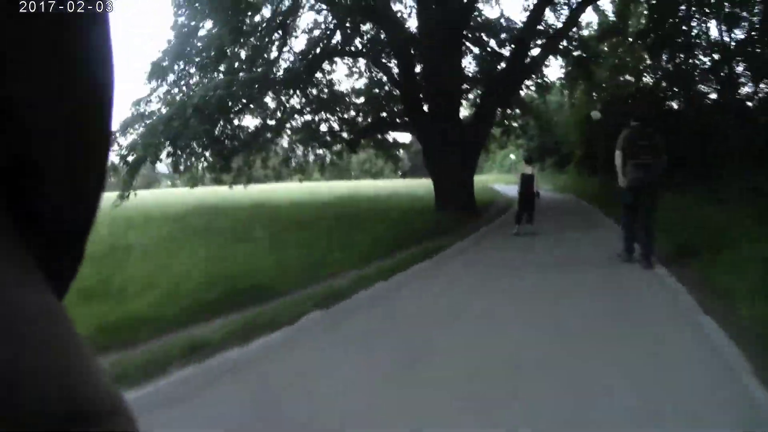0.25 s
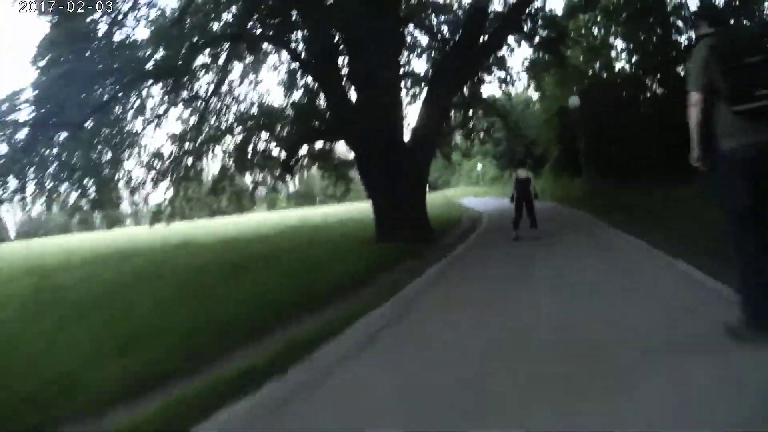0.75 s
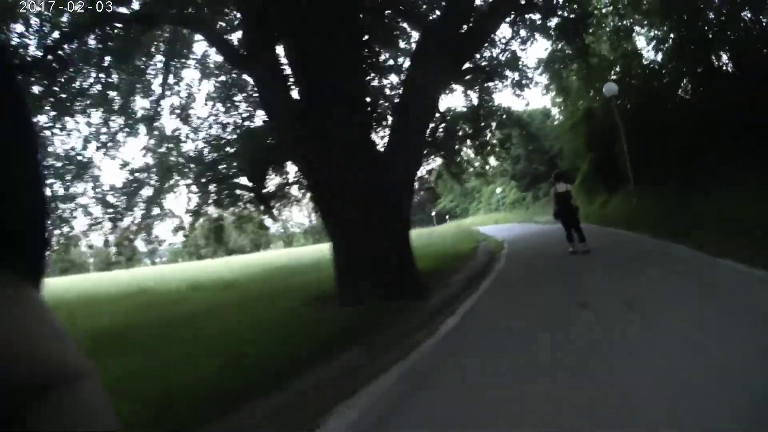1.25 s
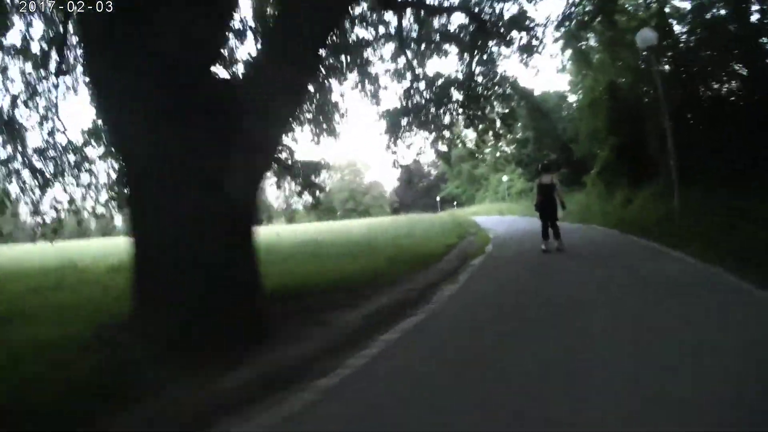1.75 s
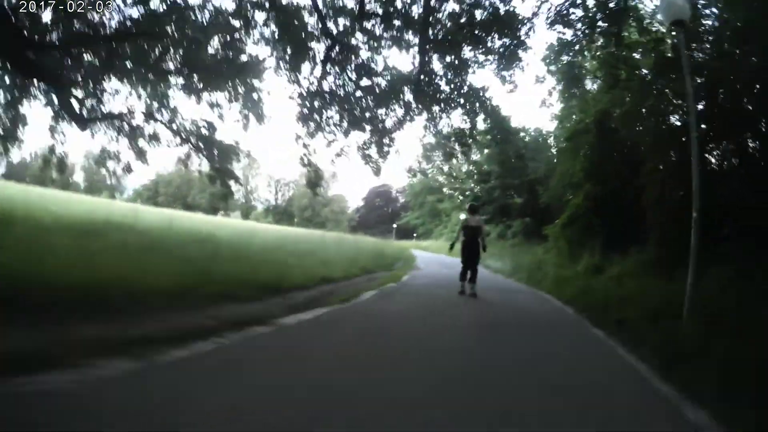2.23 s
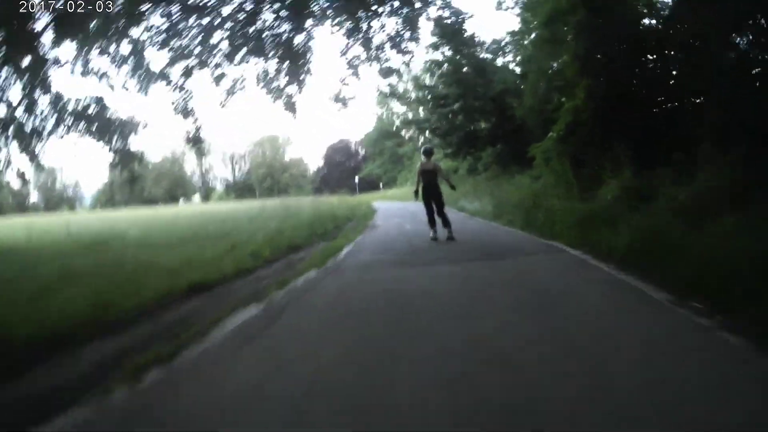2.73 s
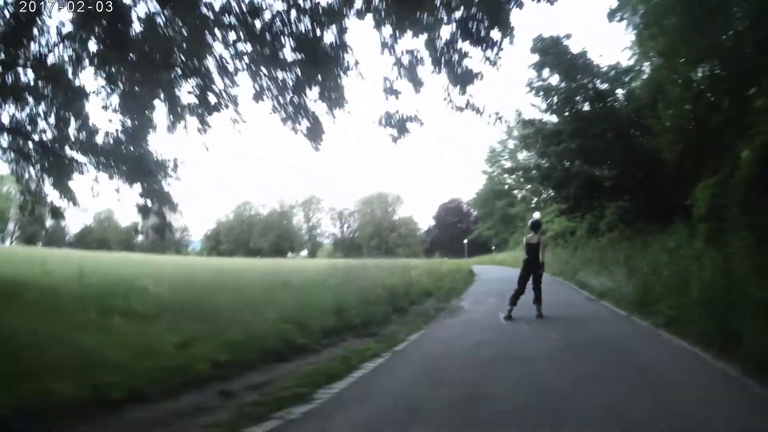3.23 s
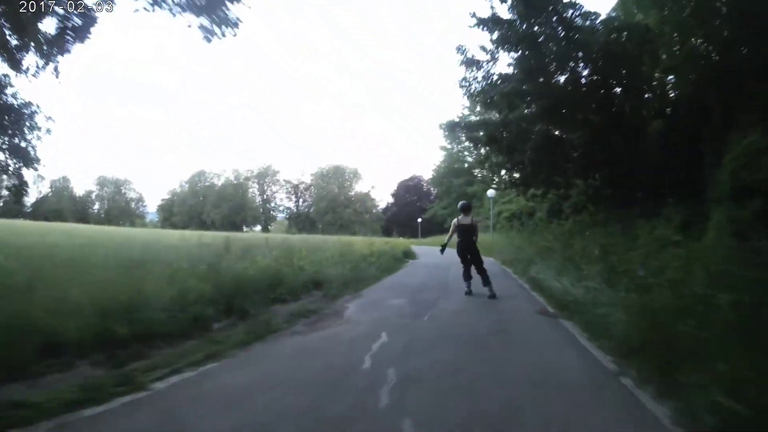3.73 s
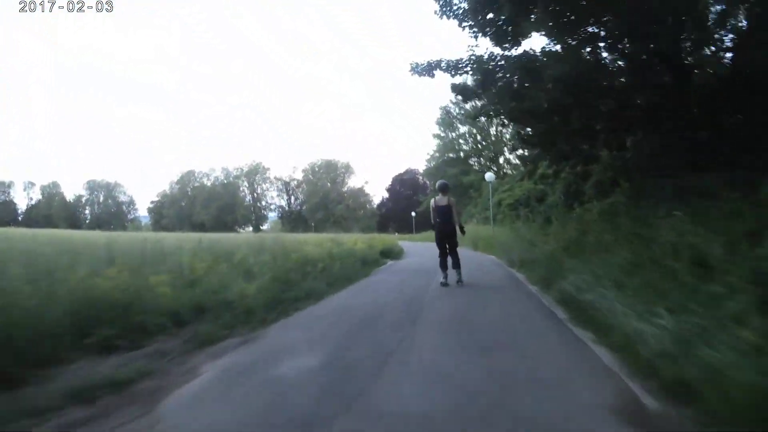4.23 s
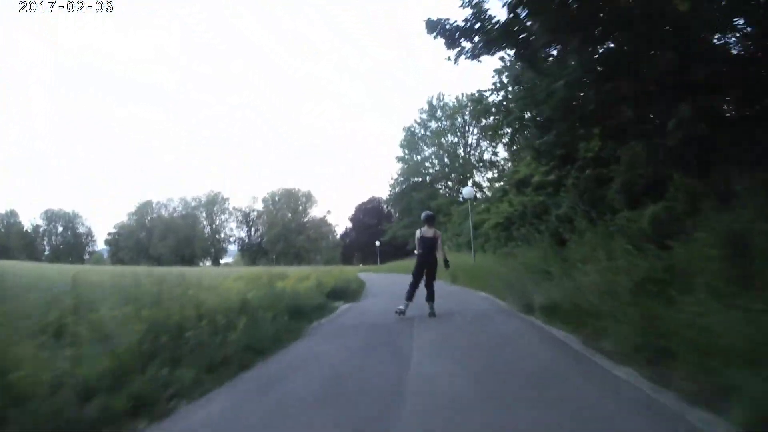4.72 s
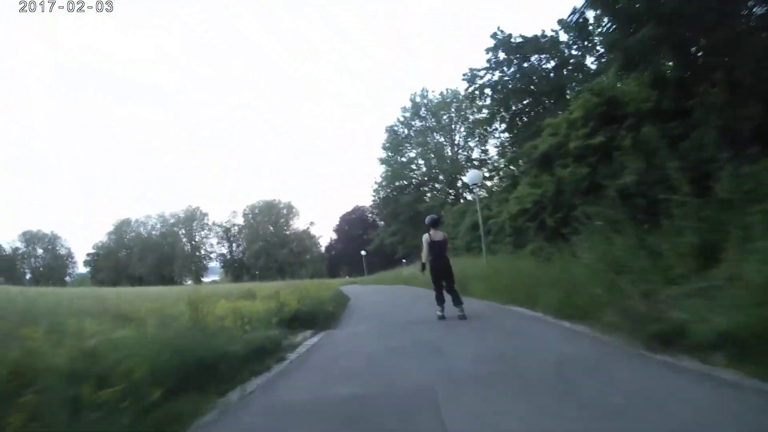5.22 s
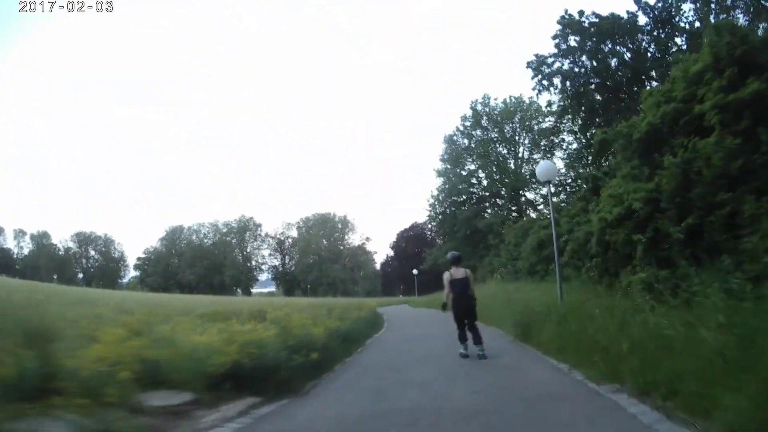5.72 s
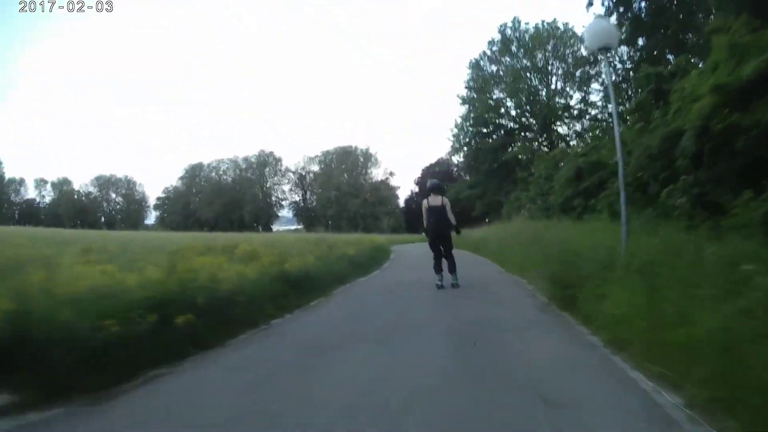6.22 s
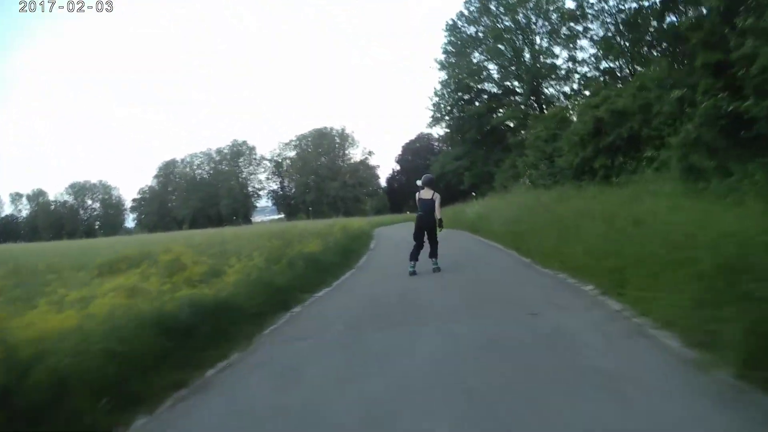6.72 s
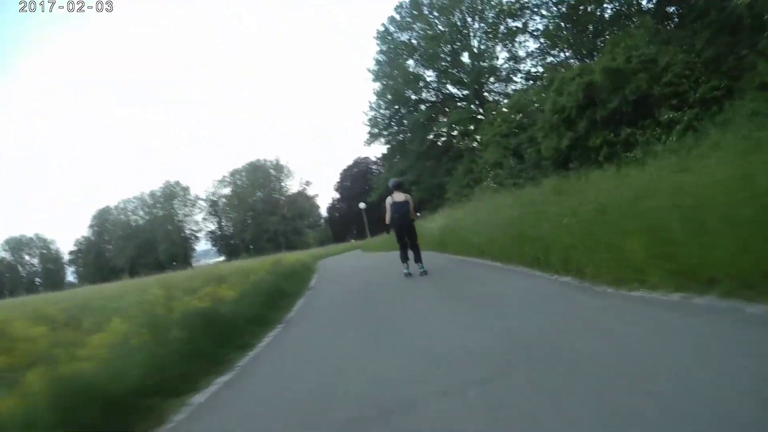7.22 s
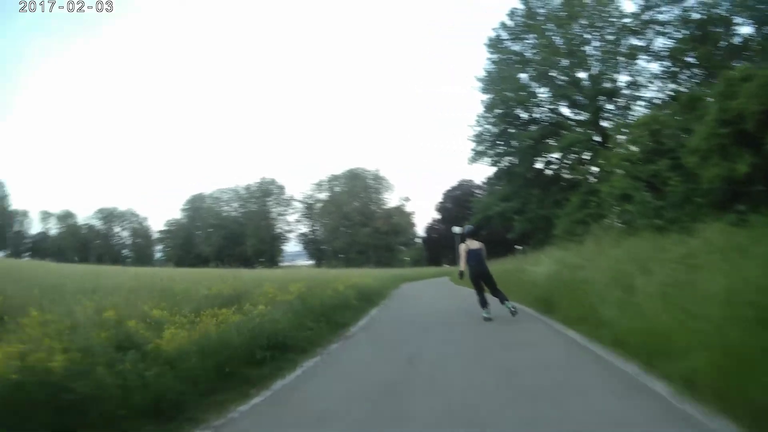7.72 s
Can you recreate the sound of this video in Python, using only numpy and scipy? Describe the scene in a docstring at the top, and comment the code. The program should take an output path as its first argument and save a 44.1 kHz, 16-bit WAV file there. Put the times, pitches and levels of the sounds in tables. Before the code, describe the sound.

Close, mono, outdoor sound from a body-worn camera: inline skate wheels roll on asphalt with a grainy rattling roar, rising with each push. Scratches and hard hollow knocks hit the plastic case in the first 1.3 seconds, the last the loudest. Afterwards low wind buffeting, pressure pops, soft whooshes and sparse ticks continue over the quieter rolling, with faint steady hiss.

```python
"""Inline skates coast down an asphalt park path: a gritty rolling roar that swells with every stroke.
Grain noise rattles frame and hub resonances; now and then a wheel scrubs or a part clicks.
Head wind buffets the skater's camera as low limited noise, with rush, whooshes and pressure pops.
Early on, scratches and ringing knocks sound on the camera case.
The electronics add a faint cluster of high sines and steady hiss."""
import sys
import numpy as np
from scipy import signal
from scipy.fft import rfft, irfft, next_fast_len
from scipy.io import wavfile
from scipy.ndimage import uniform_filter1d

SR = 44100
rng = np.random.default_rng(int(sys.argv[2]) if len(sys.argv) > 2 else 0)


def store_wav(level_fs):
    """Save 16-bit WAV to argv[1]."""
    pcm = np.round(np.clip(np.atleast_2d(level_fs), -1, 1) * 32767)
    wavfile.write(sys.argv[1], SR, pcm.T.astype(np.int16))


N = 351036
T = np.arange(N) / SR  # time in seconds

# Rolling on the slope. Each row: time in seconds, base wheel roar in dB, base bright grit in dB.
COAST = [(0, -49.5, -57.5), (0.6, -55, -65.5), (0.95, -58.5, -70), (1.4, -52, -61.5), (1.8, -56, -65.5),
         (2.4, -55.5, -65), (2.9, -60.5, -69.5), (3.2, -60.5, -67), (4.15, -55, -63.5),
         (4.45, -60.5, -69.5), (5.4, -61.5, -72), (6.3, -59.5, -67), (6.8, -60.5, -71),
         (7.96, -58.5, -69.5)]
# Strokes on one skate. Each row: hardest push in seconds, gain in dB.
STROKES = [(0.2, -1.5), (0.45, -4), (1.2, 4), (2.08, 4), (2.77, 6.5), (3.2, 4), (3.6, 4), (4.25, 2),
           (4.9, 4), (5.4, 1), (6.03, 6), (6.98, 4), (7.92, 1)]
# A skate is unweighted between strokes. Each row: start and end in seconds, level change in dB.
LIFTS = [(0.5, 0.584, -7), (0.821, 0.883, -4), (1.74, 1.85, -2.5), (3.01, 3.074, -6.5), (5.58, 5.783, -2),
         (7.333, 7.376, -5.5)]
# Skate frames and boots. Each row: resonance in Hz, nominal width in Hz, relative level in dB.
FRAME = [(1022, 265, 1.5), (1880, 370, -7), (2510, 590, -14.5)]
# Wheel hubs and bearings. Each row: resonance in Hz, nominal width in Hz, relative level in dB.
HUBS = [(3527, 510, 6), (4525, 680, -0.5), (5345, 420, 0), (6000, 550, -2), (7400, 700, -8)]
# Broad colours of wheel roar and bright grit. Each row: frequency in Hz, relative level in dB.
ROAD_COLOUR = [(150, -16), (300, 3.5), (520, -2.5), (800, 3), (1250, 1), (1550, -5), (2300, -16.5),
               (3100, -22.5), (5000, -51), (9000, -41.5)]
GRIT_COLOUR = [(1200, 1.5), (2400, -1), (3000, 3), (4800, -8.5), (7000, -5.5), (8500, -12.5),
               (12000, -18.5), (16000, -24)]

# Head wind. Each row: time in seconds, base rush level in dB.
WIND = [(0, -46), (0.55, -55), (0.85, -55), (1.2, -42), (1.85, -55.5), (2.1, -52), (2.25, -51),
        (2.58, -49.5), (2.95, -53.5), (3.3, -54.5), (4.0, -52.5), (4.3, -50.5), (5.05, -52), (5.3, -55.5),
        (5.7, -60), (6.1, -52), (7.05, -53.5), (7.33, -57), (7.96, -53)]
# Gusts, one swell each. Each row: peak time in seconds, buffeting gain in dB.
GUSTS = [(0.09, 11.5), (0.25, 14.5), (0.68, 6.5), (1.05, 7.5), (1.3, 7), (1.52, 13), (2.0, 10), (2.68, 6),
         (3.14, 5), (3.5, 5), (4.62, -1.5), (4.94, 9.5), (5.2, 9), (5.45, 9), (5.92, 11.5), (6.38, 7),
         (6.73, 10), (7.02, 9.5), (7.48, 3.5)]
# Air grazing the microphone port. Each row: start and end in seconds, hollow whoosh and thin hiss in dB.
GRAZES = [(2.365, 2.877, -60.5, -86), (2.566, 2.82, -70, -73), (4.566, 5.22, -62.5, -84),
          (4.888, 5.086, -67, -70.5), (5.3, 5.55, -71, -98), (6.67, 7.2, -63, -84)]
# Colours of low buffeting and airy rush. Each row: frequency in Hz, relative level in dB.
BUFFET_COLOUR = [(3, -5.5), (10, 3.5), (20, -0.5), (35, -13), (60, -21.5), (100, -30), (200, -58.5),
                 (500, -81.5)]
RUSH_COLOUR = [(30, -2.5), (75, 1), (120, -3.5), (200, -2.5), (350, -12.5), (600, -14), (1500, -38.5),
               (4000, -65.5)]

# Whine of the electronics. Each row: frequency in Hz, rms level in dB.
WHINE = [(11072, -103), (11122, -92), (11172, -95), (11222, -92.5), (11272, -100)]
# Colour of the electronic hiss. Each row: frequency in Hz, relative level in dB.
HISS_COLOUR = [(100, -6), (2000, 4.5), (8000, -2), (15000, -2)]

# Rubs on the case. Each row: start and end in seconds, level at the crest in dB.
RUBS = [(0.086, 0.102, -45.5), (0.153, 0.36, -53.5), (0.326, 0.546, -51), (1.023, 1.114, -54),
        (1.091, 1.156, -34.5), (1.11, 1.233, -47), (1.21, 1.317, -43)]
# Knocks on the case. Each row: start in seconds, ring peak in dB, contact time in ms,
# gain of the upper modes in dB, crack peak in dB, crack decay constant in ms.
KNOCKS = [(.116, -19.5, 1.24, 17, -44, 1.5), (0.1788, -27, 0.2, 6, -37, 3),
          (0.226, -24, 0.97, 18, -50, 1.8), (.586, -45, 0.17, 9, -59, 1.2),
          (0.8944, -23.5, 0.84, 13.5, -30, 1.4), (.931, -35.5, 0.69, 12, -62, 1.5),
          (.969, -32.5, 0.7, -1, -39.5, 2.9), (1.009, -38, 0.53, 11, -43, 1),
          (1.1213, -22, 0.25, 32, -16.5, 2.8), (1.129, -35, 0.15, -3, -25, 2.6),
          (1.1323, -21.5, 0.22, -7, -16.5, 2.3), (1.2745, -24, 1.27, 0, -57, 2),
          (1.2845, -10.5, 0.89, -2, -29, 10)]
# Camera case modes. Each row: frequency in Hz, relative level in dB, time to fall 60 dB in seconds.
CASE_MODES = [(420, -5.5, 0.028), (473, -2, 0.063), (520, -19, 0.017), (750, -21, 0.012), (920, -5, 0.023),
              (1030, 1.5, 0.0092), (1900, -17, 0.028), (2284, -8.5, 0.034), (3400, -24, 0.018),
              (5270, -24, .02)]
# A loose part buzzing with the hardest knock: start and end in seconds.
BUZZ_SPAN = (1.281, 1.307)
# Colours of a rub and of a sharp crack. Each row: frequency in Hz, relative level in dB.
RUB_COLOUR = [(100, 13.5), (300, -3.5), (490, 6.5), (700, -14), (1000, -1), (1500, -2), (2200, 1.5),
              (3600, -10), (4600, -13), (6500, -22), (9000, -28), (15000, -46)]
CRACK_COLOUR = [(300, 0), (1000, 7), (2300, -3), (3400, 4.5), (4500, -11.5), (6000, -7.5), (8500, -25),
                (12000, -31.5), (15000, -31)]

# Air pops at the port, plus two skates landing back after a lift (0.587 and 3.061 s), made the same way. Each
# row: start in seconds, pulse peak in dB, rise time in ms, crackle peak in dB.
POPS = [(0.0901, -20, 7.2, -39), (0.222, -19, 5.2, -40), (0.587, -39, 1.5, -42), (0.8933, -22.5, 2.1, -65),
        (1.095, -33, 2.4, -55), (1.224, -24, 3.2, -51), (1.526, -45, 5.7, -47), (1.994, -32, 3.3, -43),
        (2.407, -22.5, 1.86, -32), (3.061, -30, 2.4, -49), (3.419, -35, 0.57, -42), (3.559, -26, 5.2, -48),
        (3.66, -31.5, 3.6, -47), (3.845, -31.5, 6.2, -52), (4.246, -23, 2.2, -31.5), (4.54, -31, 4, -56),
        (4.647, -29, 1.8, -48), (4.918, -30, 5.1, -60), (5.2042, -18.5, 1.1, -27), (6.381, -17, 1.83, -41),
        (6.718, -20, 4.2, -45), (7.035, -32, 2.1, -41)]
# Colour of the crackle in a pop. Each row: frequency in Hz, relative level in dB.
CRACKLE_COLOUR = [(100, -8), (400, -6.5), (1050, 8), (1450, -5), (2200, -3), (3200, -26), (6000, -39),
                  (15000, -52)]

# Wheels scrub sideways on a stroke. Each row: start and end in seconds, centre in Hz, nominal level in dB.
SCRUBS = [(0.38, 0.535, 3400, -65.5), (1.15, 1.24, 5800, -65), (2.545, 3.02, 5600, -72.5),
          (3.047, 3.447, 7200, -80), (3.397, 4.148, 7400, -82), (4.85, 5.15, 5560, -74),
          (6.846, 7.338, 5600, -75)]
# Stones and skate parts clicking, and wheels landing back on the asphalt after a lift (0.969, 3.908, 5.784 and
# 7.379 s). Each row: start in seconds, peak in dB, ring in Hz.
CLICKS = [(0.969, -44, 5230), (1.447, -45, 5630), (2.246, -44.5, 3440), (2.388, -55, 8800),
          (2.562, -48, 5470), (3.184, -43.5, 5400), (3.42, -45.5, 3600), (3.908, -45.5, 1100),
          (4.06, -41.5, 6000), (4.245, -38.5, 5670), (4.278, -41, 5500), (5.784, -49.5, 6800),
          (5.971, -48, 3380), (6.381, -53, 3600), (7.004, -44, 3400), (7.037, -46, 5600),
          (7.046, -44.5, 5540), (7.133, -53.5, 5600), (7.379, -54, 1900)]

PUSH_S, RELEASE_S = 0.45, 0.17  # a stroke builds, then lets go
GRIT_STROKE_SHARE = 0.6  # share of a stroke's dB gain that the grit takes
GUST_S, GUST_RUSH_SHARE = 0.19, 0.25  # length of a gust; share of its dB gain that the rush takes
BUFFET_OVER_RUSH_DB = 13.5
BUFFET_LIMIT = 0.11  # amplitude ceiling
BUZZ_HZ, BUZZ_WIDTH_HZ, BUZZ_DB = 6400, 4300, -52
TOP_HZ = 15750


def undb(db):
    """Decibels to an amplitude factor."""
    return 10 ** (np.asarray(db) / 20)


def unit(x):
    """Scale to an rms of 1."""
    return x / np.sqrt(np.mean(x ** 2))


def peak(x, db):
    """Scale to a peak level."""
    return x * undb(db) / np.abs(x).max()


def curve(table, column):
    """One column of a table, joined by straight lines in time."""
    rows = np.array(table)
    return np.interp(T, rows[:, 0], rows[:, column])


def walk(rate):
    """Smooth random wandering with unit rms, taking a number of new steps per second."""
    hold = max(int(SR / rate), 2)
    steps = np.repeat(rng.standard_normal(N // hold + 1), hold)
    return unit(uniform_filter1d(steps, hold)[:N])


def swell(start, end):
    """A rounded rise and fall between two times."""
    return np.sin(np.pi * np.clip((T - start) / (end - start), 0, 1))


def colour(x, points):
    """Minimum-phase filter with the given outline, so no sound precedes its cause."""
    size = 2 * next_fast_len(len(x) // 2 + 4096)
    hz, db = np.transpose(points)
    bins = np.maximum(np.arange(size // 2 + 1) * SR / size, 1)
    outline_db = np.interp(np.log(bins), np.log(hz), db)
    # folding the cepstrum forward in time makes the filter causal
    cepstrum = irfft(np.log(undb(outline_db)))
    cepstrum[1:size // 2] *= 2
    cepstrum[size // 2 + 1:] = 0
    response = np.exp(rfft(cepstrum))
    return irfft(rfft(x, size) * response)[:len(x)]


def band(x, hz, width):
    """One resonance, gain 1 at its centre."""
    return signal.lfilter(*signal.iirpeak(hz, hz / width, fs=SR), x)


def double_band(x, hz, width):
    """The same resonance twice over, for steeper skirts."""
    return band(band(x, hz, width), hz, width)


def swish(hz, width):
    """A soft-edged band of hiss."""
    return unit(double_band(rng.standard_normal(N), hz, width))


def grains(rate, spread_db):
    """Tiny impacts of uneven size at random moments; the soft wheels cap the largest."""
    hit = rng.random(N) < rate / SR
    sizes = rng.standard_normal(N) * undb(spread_db * rng.standard_normal(N))
    return unit(hit * np.clip(sizes, -6, 6))


def burst(decay, tail_db=-60, tail=0.01):
    """A tenth of a second of noise that dies fast, then lingers."""
    t = T[:SR // 10]
    envelope = np.exp(-t / decay) + undb(tail_db) * np.exp(-t / tail)
    return rng.standard_normal(len(t)) * envelope


def add(out, start, sound):
    """Mix a sound in at a time in seconds."""
    i = max(int(start * SR), 0)
    out[i:i + len(sound)] += sound[:N - i]


def stroke_db():
    """Each push builds steadily and eases off after its peak."""
    return sum(db * np.interp(T - s, [-PUSH_S, 0, RELEASE_S], [0, 1, 0]) for s, db in STROKES)


def wheel_load(turn_hz=26, lumpy_db=0.83, flutter_db=1.5):
    """Worn wheels press harder once a turn, the pressure flutters, and lifted skates press less."""
    turns = np.cumsum(turn_hz * (1 + 0.079 * walk(2.2))) / SR
    lift_db = sum(db * ((T > start) & (T < end)) * 1. for start, end, db in LIFTS)
    lift_db = uniform_filter1d(lift_db, size=500)  # soften the edges
    return undb(lumpy_db * np.sin(2 * np.pi * turns) + flutter_db * walk(30) + lift_db)


def rattle(modes, rate, spread_db, widen, shift_rate, chatter_db=1.06):
    """Grains shake resonances that wax and wane as the weight shifts from wheel to wheel."""
    out = np.zeros(N)
    for hz, width, db in modes:
        ringing = double_band(grains(rate, spread_db), hz, widen * width)
        out += undb(db + chatter_db * walk(shift_rate)) * ringing
    return unit(out)


def skates():
    """Asphalt grains shake the frames and hubs, harder on each stroke."""
    push_db = stroke_db()
    roar_db = curve(COAST, 1) + push_db
    grit_db = curve(COAST, 2) + GRIT_STROKE_SHARE * push_db

    frame = rattle(FRAME, rate=4000, spread_db=2.74, widen=1.1, shift_rate=10)
    road = unit(colour(grains(5000, 1.57), ROAD_COLOUR))
    roar = undb(-1.5) * frame + undb(-0.5) * road

    hubs = rattle(HUBS, rate=5000, spread_db=4.7, widen=1.3, shift_rate=12)
    fine_grit = unit(colour(grains(5000, 6), GRIT_COLOUR))
    grit = undb(-2.5) * hubs + undb(-3.0) * fine_grit
    return wheel_load() * (roar * undb(roar_db) + grit * undb(grit_db))


def wind(gusty_db=1.5):
    """Slow eddies push the diaphragm; small ones rush with them, and whoosh when they graze the port."""
    wind_db = curve(WIND, 1)
    gust_db = sum(db * swell(s - GUST_S / 2, s + GUST_S / 2) for s, db in GUSTS)

    buffet = unit(colour(rng.standard_normal(N), BUFFET_COLOUR))
    buffet *= undb(wind_db + gust_db + BUFFET_OVER_RUSH_DB)
    # the narrow port chokes the strongest gusts
    buffet = BUFFET_LIMIT * np.tanh(buffet / BUFFET_LIMIT)

    rush = unit(colour(rng.standard_normal(N), RUSH_COLOUR) * undb(gusty_db * walk(35)))
    out = buffet + rush * undb(wind_db + GUST_RUSH_SHARE * gust_db)

    whoosh, hiss = swish(1760, 720), swish(6800, 6000)
    for start, end, whoosh_db, hiss_db in GRAZES:
        out += swell(start, end) * (undb(whoosh_db) * whoosh + undb(hiss_db) * hiss)
    return out


def electronics(hiss_db=-79):
    """Closely spaced sines beat into a thin pulsing whine over steady hiss."""
    whine = sum(undb(db) * np.sqrt(2) * np.cos(2 * np.pi * hz * T) for hz, db in WHINE)
    hiss = unit(colour(rng.standard_normal(N), HISS_COLOUR))
    return whine + undb(hiss_db) * hiss


def rubs(scratchy_db=3.5):
    """Something brushes the case: dense grains scratch unevenly over the plastic."""
    scratch = unit(colour(grains(7000, 3.8), RUB_COLOUR) * undb(scratchy_db * walk(120)))
    return scratch * sum(undb(db) * swell(start, end) for start, end, db in RUBS)


def pops(crackle_decay=0.0018, snap=5):
    """An eddy bursts on the port, or a lifted skate lands back: one pressure pulse with a snap and a short
    crackle."""
    out, t = np.zeros(N), T[:SR // 10]
    for s, db, rise_ms, crackle_db in POPS:
        u = t / (rise_ms / 1000)
        pulse = u ** 2 * np.exp(-2 * u)  # crests at u = 1
        crackle = burst(crackle_decay) + snap * (t == 0)
        crackle = colour(crackle, CRACKLE_COLOUR)
        add(out, s, peak(crackle, crackle_db) - peak(pulse, db))
    return out


def knocks():
    """Blows ring the modes of the plastic case, duller when the contact is soft, and crack on top."""
    out, t = np.zeros(N), T[:SR // 5]
    modes = []
    for hz, db, t60 in CASE_MODES:
        decay = np.exp(-np.log(1000) * t / t60)
        modes.append(undb(db) * np.cos(2 * np.pi * hz * t) * decay)
    for s, db, contact_ms, upper_db, crack_db, crack_ms in KNOCKS:
        # a blow near the edge favours the upper modes over the three hollow ones
        ring = sum(modes[:3]) + undb(upper_db) * sum(modes[3:])
        push = np.sin(np.pi * np.minimum(t / (contact_ms / 1000), 1))
        struck = signal.fftconvolve(push, ring)[:len(t)]
        crack = colour(burst(crack_ms / 1000), CRACK_COLOUR)
        add(out, s, peak(struck, db))
        add(out, s, peak(crack, crack_db))
    return out


def buzz():
    """A loose part buzzes with the hardest knock, as a brief swell of hiss."""
    return undb(BUZZ_DB) * swell(*BUZZ_SPAN) * swish(BUZZ_HZ, BUZZ_WIDTH_HZ)


def scrubs(width=1500, rough_db=3.5):
    """A leaning wheel slips over the asphalt in a narrow, uneven hiss."""
    slips = sum(undb(db) * swell(start, end) * swish(hz, width) for start, end, hz, db in SCRUBS)
    return undb(rough_db * walk(45)) * slips


def clicks(decay=0.0035, ring_db=4):
    """A stone flicks against a wheel, a skate part ticks, or a lifted wheel lands back on the asphalt: a crack
    plus one ringing band."""
    out = np.zeros(N)
    for s, db, hz in CLICKS:
        hit = burst(decay, tail_db=-4, tail=0.011)
        click = colour(hit, CRACK_COLOUR) + undb(ring_db) * band(hit, hz, 520)
        add(out, s, peak(click, db))
    return out


def scene():
    """Everything reaches the one microphone from close by, in open air."""
    rolling = skates() + scrubs() + clicks()
    air = wind() + pops()
    camera = electronics() + rubs() + knocks() + buzz()
    return (rolling + air + camera)[None]  # one channel


def record(dry):
    """The camera cuts the top with a steep low-pass."""
    low_pass = signal.ellip(10, 0.2, 80, TOP_HZ, fs=SR, output="sos")
    return signal.sosfilt(low_pass, dry)


dry = scene()
out = record(dry)
store_wav(out)
```